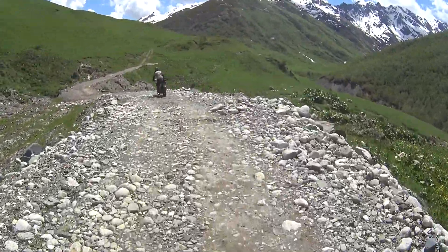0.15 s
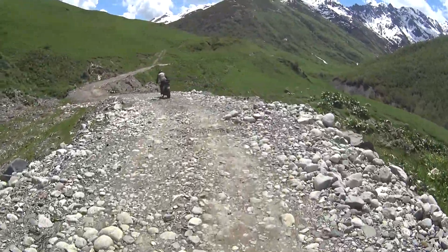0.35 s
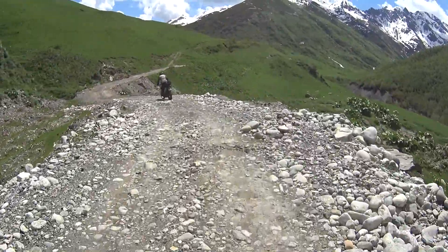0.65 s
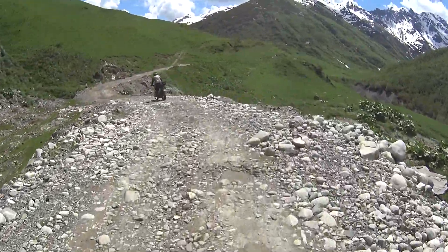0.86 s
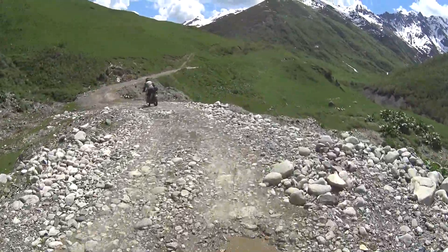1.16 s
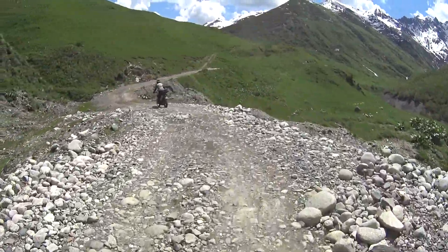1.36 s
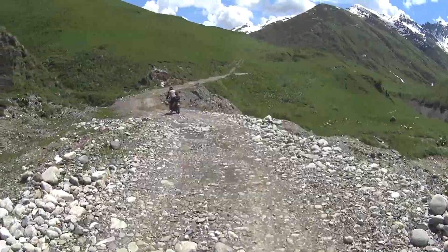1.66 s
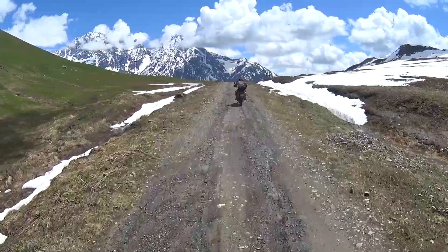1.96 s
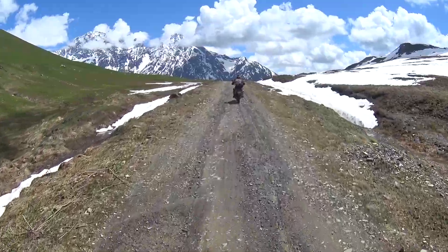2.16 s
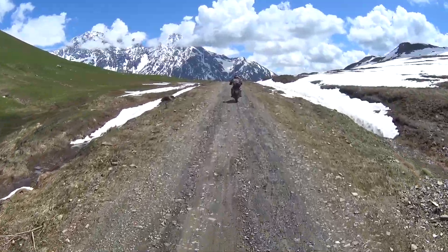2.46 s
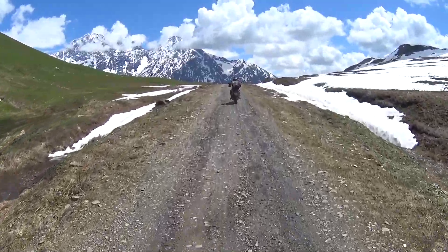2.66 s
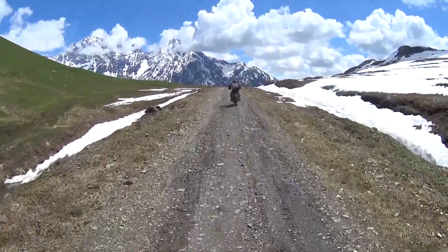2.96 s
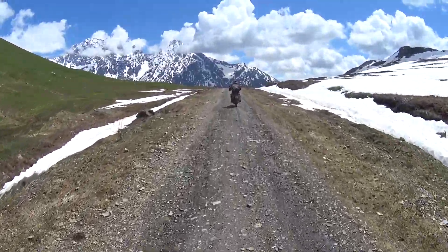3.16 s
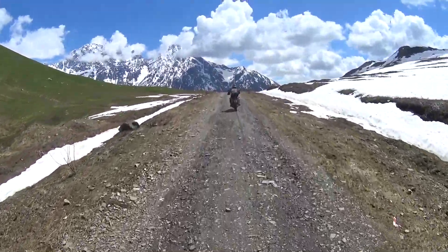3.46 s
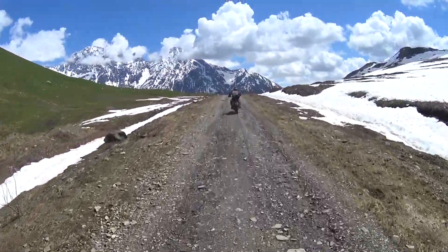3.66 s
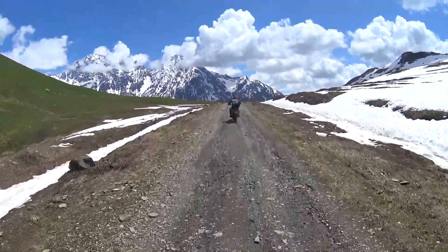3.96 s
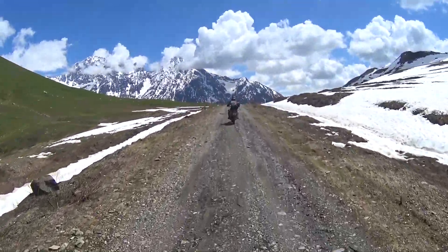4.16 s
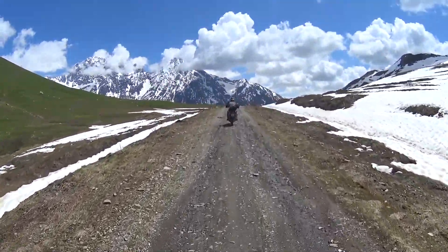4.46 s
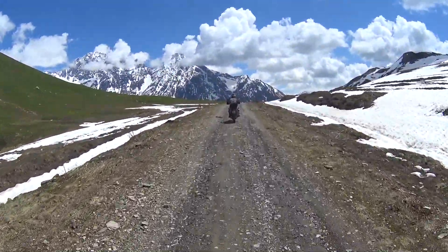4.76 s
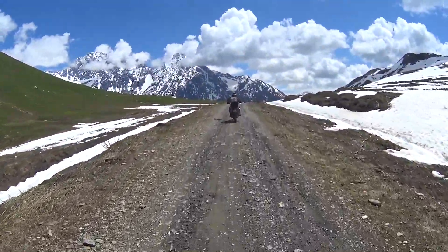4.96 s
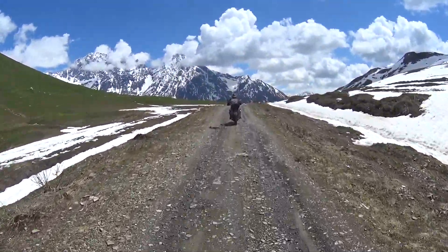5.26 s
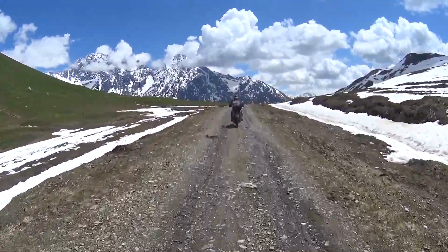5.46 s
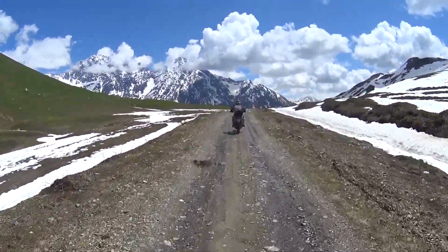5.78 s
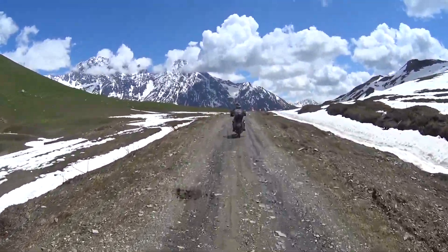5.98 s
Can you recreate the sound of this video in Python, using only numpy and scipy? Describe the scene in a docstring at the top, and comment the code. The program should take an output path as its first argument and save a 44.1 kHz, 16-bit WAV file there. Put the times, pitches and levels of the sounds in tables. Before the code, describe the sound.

A single-cylinder motorcycle chugs over loose rocks with knocks and clacking stones, then cuts to a smoother dirt climb, revving up and easing off.

```python
"""On a gravel track, a single-cylinder motorcycle is heard from a camera on the rider's helmet.
Two scenes: it rolls slowly over loose rocks, then, after a quick cut, climbs a smoother dirt road.
Each firing sends a pulse through a ringing exhaust; metal ticks and fuzzy bands make the clatter.
Tyres hiss as showers of tiny grains, and wind buffets the camera as slowly swelling deep noise.
Jolts knock and ring the camera housing, and stones clack as short bursts of ringing noise."""
import sys
import numpy as np
from scipy import signal
from scipy.fft import rfft, irfft
from scipy.io import wavfile

SR = 44100
rng = np.random.default_rng(int(sys.argv[2]) if len(sys.argv) > 2 else 0)


def output_pcm(signal):
    """Save a mono or channel-first signal as 16-bit PCM at the path in sys.argv[1].

    Samples are clipped to [-1, 1] before scaling.
    """
    pcm = np.clip(np.atleast_2d(signal).T, -1, 1) * 32767
    wavfile.write(sys.argv[1], SR, np.round(pcm).astype(np.int16))


N = 269892
T = np.arange(N) / SR  # the time of every sample, in seconds
HZ = np.fft.rfftfreq(N, 1 / SR)  # the pitches of the whole sound's spectrum
EDGE_HZ = 11100  # little is heard above this


def amp(db):
    """Turns decibels into a gain."""
    return 10 ** (np.asarray(db) / 20)


def unit(x):
    """Scales a sound to an average (rms) level of 1."""
    return x / np.sqrt(np.mean(x ** 2) + 1e-20)


def curves(rows):
    """Draws straight lines between the rows of a table, one curve for each column after the time."""
    s, *columns = np.transpose(rows)
    return [np.interp(T, s, column) for column in columns]


def colour(x, points):
    """Filters a sound with a gain at each pitch, then scales it to rms 1."""
    hz, db = np.transpose(points)
    gain = amp(np.interp(np.log(HZ + 1), np.log(hz), db))
    return unit(irfft(rfft(x) * gain, N))


def wander(rate_hz):
    """Smooth random motion of rms 1: noise with only its slow part kept."""
    slow = np.exp(-(HZ / rate_hz) ** 2)
    return unit(irfft(rfft(rng.standard_normal(N)) * slow, N))


def fuzzy_band(hz, width_hz):
    """Noise gathered around one pitch, as a resonance does, at rms 1."""
    resonance = 1 / (1 + ((HZ - hz) / width_hz) ** 2)
    return unit(irfft(rfft(rng.standard_normal(N)) * resonance, N))


def ring(modes):
    """A struck body rings as a sum of dying tones; t60 is the time to fall by 60 dB."""
    t = np.arange(SR // 8) / SR
    return sum(amp(db - 60 * t / t60) * np.sin(2 * np.pi * hz * t) for hz, db, t60 in modes)


def rattle(hz, t60, q=1.0, strike=6, overtone_reach=1.87):
    """A click and quickly dying noise, passed twice through one broad resonance."""
    t = np.arange(SR // 8) / SR
    drive = rng.standard_normal(len(t)) - strike * (t == 0)
    top_hz = min(overtone_reach * hz, EDGE_HZ)
    drive = signal.sosfilt(signal.butter(4, top_hz, fs=SR, output="sos"), drive)
    b, a = signal.iirpeak(hz, q, SR)
    ringing = signal.lfilter(b, a, signal.lfilter(b, a, drive))
    return amp(-60 * t / t60) * unit(ringing)


def grains(per_s, spread_db):
    """Random clicks of either sign, mostly small, a few large, at rms 1."""
    size = amp(spread_db * np.minimum(rng.exponential(1, N), 4))
    happens = rng.random(N) < per_s / SR
    return unit(np.sign(rng.standard_normal(N)) * size * happens)


def add(mix, s, sound):
    """Lays a sound into the mix, starting at time s."""
    part = mix[round(s * SR):][:len(sound)]
    part += sound[:len(part)]


CHANGE_S, CHANGE_LASTS_S = 1.82, 0.015  # a quick cut from the scene on rocks to the one on dirt


def on_road():
    """Which scene is playing: 0 on the rocks, 1 on the dirt road."""
    return np.clip((T - CHANGE_S) / CHANGE_LASTS_S + .5, 0, 1)


def by_ground(x, on_rocks, on_dirt):
    """Crossfades a sound from its colour on the rocks to its colour on the dirt road."""
    road = on_road()
    return (1 - road) * colour(x, on_rocks) + road * colour(x, on_dirt)


# How fast the engine runs. Each row: time in seconds, firings per second.
ENGINE_SPEED = [(0.0, 26.48), (0.5, 27.18), (0.95, 26.87), (1.3, 24.19), (1.9, 23.06), (2.2, 23.34),
                (3.1, 26.9), (3.8, 29.46), (4.15, 30.56), (4.45, 32.18), (4.85, 33.24), (5.3, 33.26),
                (6.12, 31.4)]
# How far the throttle is open. Each row: time in seconds, opening from 0 to 1.
THROTTLE_OPENING = [(0, 0.03), (.5, 0.65), (.8, 0), (1.3, 0.62), (1.9, .36), (2.9, 0.73), (4.1, 1),
                    (4.85, 0.92), (5.15, 0), (6.12, 0.04)]
# A layer using effort() has its level_db at this speed, throttle shut, on the dirt road.
CRUISE_RATE = 28  # firings per second


def effort(octave_db, throttle_db=0, rocks_db=0):
    """Gain of a layer: dB per doubling of engine speed, for full throttle, and for being on rocks."""
    (speed,), (opening,) = curves(ENGINE_SPEED), curves(THROTTLE_OPENING)
    speed_gain_db = octave_db * np.log2(speed / CRUISE_RATE)
    return amp(speed_gain_db + throttle_db * opening + rocks_db * (1 - on_road()))


# Tone of the deep gusts. Each row: pitch in Hz, gain in dB.
GUST_COLOUR = [(8, -41), (18, -0.5), (30, -15), (42, -13), (60, -17), (140, -48), (400, -80)]
# Tone of the quicker eddies. Each row: pitch in Hz, gain in dB.
EDDY_COLOUR = [(30, -12), (60, -0.5), (95, 8.5), (140, -1), (200, 0.5), (280, -6), (380, -16), (600, -13),
               (1200, -23), (4000, -74)]


def wind(rumble_db=-40.5, buffet_db=-38.5, gusty_db=2.5, lumpy_db=1.0):
    """Deep gusts and quicker eddies around the helmet, both growing with engine speed."""
    gusts = colour(rng.standard_normal(N), GUST_COLOUR) * amp(gusty_db * wander(3.4))
    eddies = colour(rng.standard_normal(N), EDDY_COLOUR) * amp(lumpy_db * wander(33))
    gust_gain = amp(rumble_db) * effort(octave_db=13.5, throttle_db=1.5, rocks_db=-0.5)
    eddy_gain = amp(buffet_db) * effort(octave_db=15, rocks_db=-0.5)
    return gust_gain * unit(gusts) + eddy_gain * unit(eddies)


# Bumps that sway or shake the helmet.
# Each row: time of the middle in seconds, peak level in dB, sway rate in Hz.
HELMET_BUMPS = [(0.039, -30, 25), (.56, -25, 32), (0.709, -30, 20), (1.061, -27, 95), (1.109, -27, 32),
                (1.28, -26, 43), (1.395, -23.5, 21.8), (1.46, -24, 23.5), (1.629, -24, 36),
                (1.701, -21, 42), (3.11, -32.5, 30)]


def bumps(sway_cycles=3.9):
    """Each bump rocks the helmet to and fro: a deep wobble of air pressure that swells and dies."""
    out = np.zeros(N)
    for s, db, hz in HELMET_BUMPS:
        length = sway_cycles / hz
        t = np.arange(-length / 2, length / 2, 1 / SR)
        swell = np.cos(np.pi * t / length) ** 2
        sway = amp(db) * swell * np.cos(2 * np.pi * hz * t)
        out += np.interp(T, s + t, sway, left=0, right=0)
    return out


# Patches of loose grit under the tyres. Each row: time in seconds, level of the hiss in dB.
GRIT_LEVEL = [(0, -43), (.5, -43.5), (.78, -41), (1.15, -47), (1.8, -45.5), (1.9, -42.8), (2.25, -42.5),
              (2.8, -44.5), (3.7, -42), (6.12, -40.5)]
# Tone of the hiss on the rocks. Each row: pitch in Hz, gain in dB.
HISS_ON_ROCKS = [(1500, -49), (3200, 12), (4000, 7.5), (4900, 8.5), (5800, 3), (6600, -4.5), (7400, -13.5),
                 (8800, -17.5), (10000, -24), (11000, -22)]
# Tone of the hiss on the dirt road. Each row: pitch in Hz, gain in dB.
HISS_ON_ROAD = [(1500, -7), (3200, -4), (4000, -9.5), (4900, 2.5), (5600, 3), (6200, -3), (7000, -13),
                (8000, -21.5), (8900, -21.5), (10000, -30), (11000, -29)]


def tyres(flutter_db=1.16):
    """Grit crushed under the tyres: many tiny clicks blur into a fine hiss."""
    hiss_db, = curves(GRIT_LEVEL)
    grit = grains(per_s=14000, spread_db=3.0) * amp(flutter_db * wander(70))
    return amp(hiss_db) * by_ground(grit, HISS_ON_ROCKS, HISS_ON_ROAD)


# Stones that strike the machine.
# Each row: start in seconds, starting level in dB, pitch in Hz, time to fall by 60 dB in seconds.
STONE_CLACKS = [(.473, -26, 960, 0.029), (1.518, -38.5, 3380, 0.26), (1.558, -30.5, 3330, 0.044),
                (1.599, -22.5, 2060, 0.022), (1.665, -30.5, 1700, 0.12), (1.826, -29, 1230, 0.021),
                (3.3323, -22, 1700, 0.026), (4.626, -30, 3580, 0.026), (4.677, -28, 2780, 0.025)]


def clacks():
    """Thrown stones strike the machine, each ringing around its own pitch."""
    out = np.zeros(N)
    for s, db, hz, t60 in STONE_CLACKS:
        add(out, s, amp(db) * rattle(hz, t60))
    return out


# Jolts that knock the camera housing. Each row: start in seconds, peak level in dB,
# direction +1 or -1, contact time in milliseconds, time for the thud to fall by 60 dB in seconds.
HOUSING_KNOCKS = [(0.4715, -15.5, -1, 0.2, 0.0062), (1.0284, -9.5, -1, 0.61, .018),
                  (1.045, -15.5, -1, 2.6, 0.011), (1.0627, -13, 1, 0.59, 0.041),
                  (1.5822, -19, 1, 0.94, 0.024), (1.5949, -8.5, -1, 0.17, 0.021),
                  (1.6772, -8.5, -1, 0.18, 0.044), (3.3494, -7, -1, 0.36, 0.019),
                  (3.5208, -21.5, 1, 5.6, 0.034), (3.6175, -12, -1, 0.4, 0.024),
                  (3.9154, -9.5, -1, 0.37, 0.019), (4.2372, -10, -1, 0.53, 0.015),
                  (4.3904, -16.5, 1, 3.7, 0.021), (4.7967, -13.5, -1, 0.66, 0.014),
                  (4.962, -12.5, 1, 2, 0.015)]
# Ringing of the housing above its thud.
# Each row: pitch in Hz, level against the thud in dB, time to fall by 60 dB in seconds.
HOUSING_MODES = [(456, -9, 0.011), (704, -45, 0.003), (1260, -4, 0.0092), (1580, -21.5, 0.018),
                 (2530, -18, 0.006)]
# Rattle of the camera mount on the rocks. Each row: pitch in Hz, level against the knock in dB
# (before a long contact softens it), time to fall by 60 dB in seconds.
MOUNT_ON_ROCKS = [(670, -20, 0.062), (2190, -19.5, 0.047)]
# The same for the dirt road, with the same columns: pitch in Hz, level in dB, fall time in seconds.
MOUNT_ON_ROAD = [(1700, -20, 0.044)]
THUD_HZ = 204.3  # lowest mode of the housing


def knocks(spring_back_hz=55, hard_contact_ms=0.65):
    """Each jolt pushes the housing, which springs back; short contacts ring and rattle it more."""
    out, t = np.zeros(N), np.arange(SR // 100) / SR
    spring_back = signal.butter(1, spring_back_hz, "high", fs=SR)
    for s, db, direction, contact_ms, thud_t60 in HOUSING_KNOCKS:
        push = np.sin(np.pi * np.minimum(1000 * t / contact_ms, 1))
        knock = signal.fftconvolve(push, ring([(THUD_HZ, 0, thud_t60)] + HOUSING_MODES))
        knock = signal.lfilter(*spring_back, knock)
        add(out, s, direction * amp(db) * knock / abs(knock).max())
        mount = MOUNT_ON_ROCKS if s < CHANGE_S else MOUNT_ON_ROAD
        shake = sum(amp(share_db) * rattle(hz, t60) for hz, share_db, t60 in mount)
        add(out, s, amp(db) * shake / np.hypot(1, contact_ms / hard_contact_ms))
    return out


# Whirr of the drive chain on the rocks. Each row: time in seconds, level in dB.
CHAIN_LEVEL = [(0, -47), (.5, -38), (.8, -44.5), (1.3, -40), (1.7, -54)]


def chain():
    """The drive chain whirrs as one band of noise over the rocks."""
    whirr_db, = curves(CHAIN_LEVEL)
    return amp(whirr_db) * (1 - on_road()) * fuzzy_band(hz=2250, width_hz=200)


def gears(cycles, level_db=-54, mesh_db=-57, meshes_per_cycle=11.7):
    """Meshing teeth hum faintly, and under load the gears sing a fuzzy band."""
    tone = np.sqrt(2) * np.sin(2 * np.pi * meshes_per_cycle * cycles)
    hum = amp(mesh_db + 3.6 * wander(8.2)) * tone
    song_gain = amp(level_db) * effort(octave_db=38, throttle_db=4.5, rocks_db=2.5)
    return hum + song_gain * fuzzy_band(hz=2780, width_hz=310)


# Tone of the engine clatter on the rocks. Each row: pitch in Hz, gain in dB.
CLATTER_ON_ROCKS = [(300, -4), (550, -6.5), (850, -7.5), (1100, -5.5), (1400, 6.5), (1650, -5),
                    (2000, -0.5), (2300, -3), (2700, 0.5), (3300, -12), (4200, -39), (7000, -40.5)]
# Tone of the engine clatter on the dirt road. Each row: pitch in Hz, gain in dB.
CLATTER_ON_ROAD = [(300, -7.5), (550, -6.5), (850, -13), (1130, -0.5), (1260, -4), (1420, 2.5),
                   (1650, -5.5), (2000, -3.5), (2450, -4.5), (2800, -6.5), (3300, -7.5), (4200, -8.5),
                   (7000, -35.5)]


def clatter(cycles, level_db=-38.0, valve_depth=0.058, crank_depth=0.047, flutter_db=1.1):
    """Ticks of valves, gears and chain, bunched by the engine cycle, ring the engine cases."""
    valve_beat = valve_depth * np.cos(2 * np.pi * (cycles + 0.37))
    crank_beat = crank_depth * np.cos(4 * np.pi * (cycles + 0.8))
    ticks = grains(per_s=9000, spread_db=1.5) * (1 + valve_beat + crank_beat)
    ticks = ticks * amp(flutter_db * wander(27))
    gain = amp(level_db) * effort(octave_db=13.5, rocks_db=0.45)
    return gain * by_ground(ticks, CLATTER_ON_ROCKS, CLATTER_ON_ROAD)


def drone(cycles, level_db=-48.5):
    """The crank hums at one wave per turn (two per cycle), strongly under load."""
    hum = np.sqrt(2) * np.cos(4 * np.pi * (cycles + 0.029))
    return amp(level_db) * effort(octave_db=9, throttle_db=10, rocks_db=-5) * hum


def intake(cycles, level_db=-57.0, rasp=0.27, open_s=.0025):
    """Once a cycle the inlet valve opens and a puff sounds the airbox, louder with more throttle."""
    pulses = np.diff(np.floor(cycles - .715), prepend=-1)
    gate = signal.oaconvolve(pulses, signal.windows.gaussian(SR // 40, open_s * SR), "same")
    airbox = [(200, -33), (340, -25.0), (440, 8.5), (520, 4.0),
              (640, 4), (760, -8.5), (1200, -43), (3000, -62)]  # Hz, dB
    breath = colour(gate * rng.standard_normal(N), airbox)
    puffs = colour(pulses, airbox) + rasp * breath
    return amp(level_db) * effort(octave_db=3.0, throttle_db=11) * unit(puffs)


def firings(cycles, level_db=-47.5, uneven_db=3.6, blow_s=0.0034):
    """Every two crank turns a soft, uneven blow of exhaust gas rings the pipe."""
    pulses = np.diff(np.floor(cycles - .63), prepend=-1) * amp(uneven_db * wander(27))
    blow = np.sin(np.pi * np.minimum(T[:SR // 100] / blow_s, 1)) ** 2
    pipe_modes = [(88, 0, 0.06), (117, -10.5, 0.13), (204.0, -1.5, 0.066),
                  (287.0, 1, 0.094), (311.4, -0.5, 0.05)]  # Hz, dB, t60 in seconds
    pipe = signal.fftconvolve(blow, ring(pipe_modes))
    # the tone slopes down slightly, by 1.5 dB, between 66 and 84 Hz
    thump = colour(signal.oaconvolve(pulses, pipe)[:N], [(66, -15), (84, -16.5)])
    return -amp(level_db) * effort(octave_db=2, throttle_db=1.0, rocks_db=-4.0) * thump


def port_difference(x, boost=1.79, centre_hz=950, top_hz=12000):
    """Sound reaches the right port just before the left; the camera widens that small difference."""
    u = HZ / centre_hz
    tilt = -1j * boost * 2 * u / (1 + u ** 2)  # -1j is a quarter-turn of phase
    return irfft(rfft(x) * tilt / np.hypot(1, HZ / top_hz), N)


def scene(scatter_db=-12, clatter_scatter_db=-12):
    """Machine, ground and wind at the two ports; a little arrives scattered from all sides."""
    speed, = curves(ENGINE_SPEED)
    cycles = np.cumsum(speed) / SR  # engine cycles so far, one firing in each
    ground_and_air = wind() + bumps() + tyres() + clacks() + knocks()
    engine = chain() + gears(cycles) + clatter(cycles) + drone(cycles) + intake(cycles) + firings(cycles)
    mid = ground_and_air + engine
    # fresh random grains, unlike those in the middle, widen the sound
    scattered = amp(scatter_db) * tyres() + amp(clatter_scatter_db) * clatter(cycles)
    side = port_difference(mid) + scattered
    return np.array([mid + side, mid - side])


def record(dry, ceiling=0.88, low_cut_hz=12):
    """The hardest knocks overload the microphone softly; then the lowest and highest pitches are cut."""
    overloaded = ceiling * np.tanh(dry / ceiling)
    limited = signal.lfilter(*signal.butter(1, low_cut_hz, "high", fs=SR), overloaded)
    top_cut = signal.firwin(801, EDGE_HZ, window=("kaiser", 9), fs=SR)
    return signal.oaconvolve(limited, top_cut[None], "same")


dry = scene()
out = record(dry)
output_pcm(out)
```